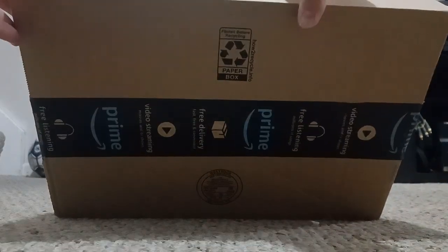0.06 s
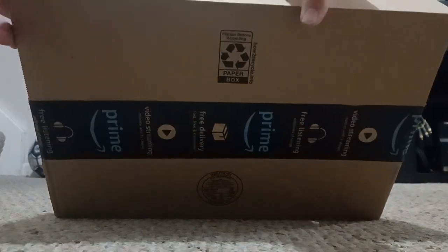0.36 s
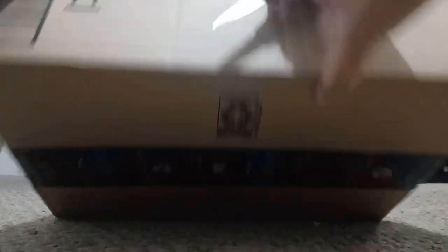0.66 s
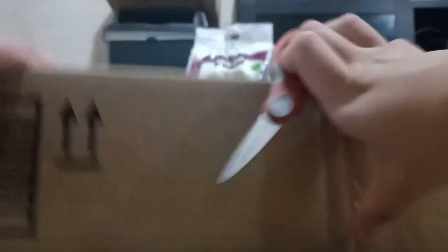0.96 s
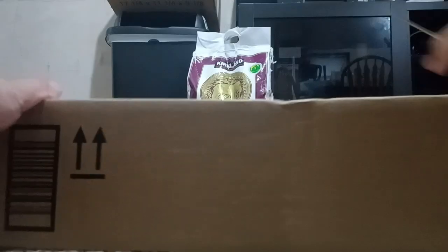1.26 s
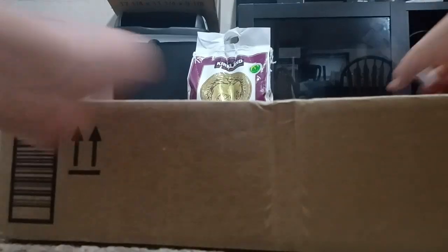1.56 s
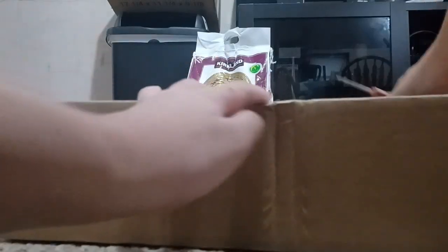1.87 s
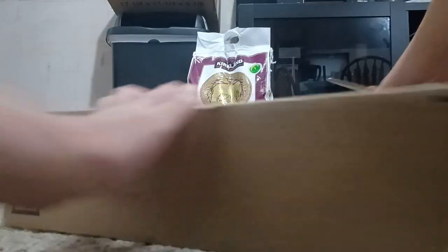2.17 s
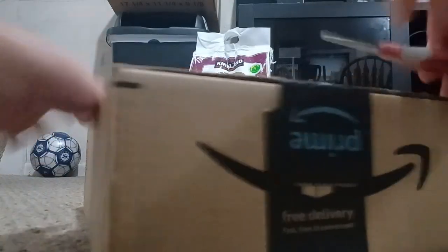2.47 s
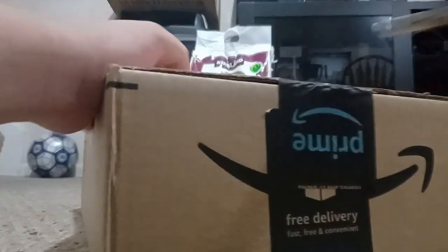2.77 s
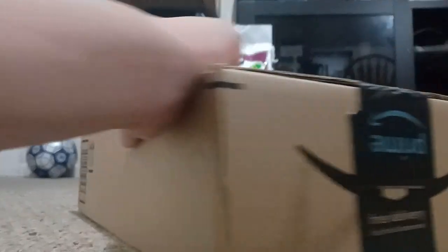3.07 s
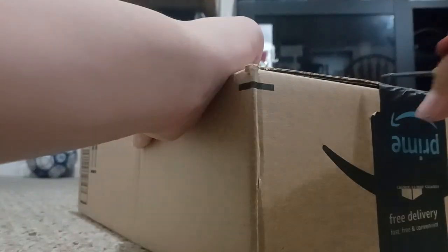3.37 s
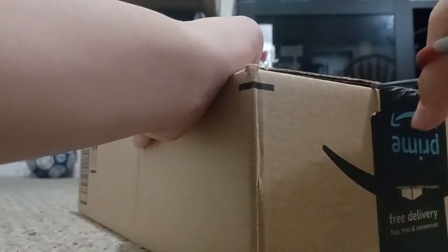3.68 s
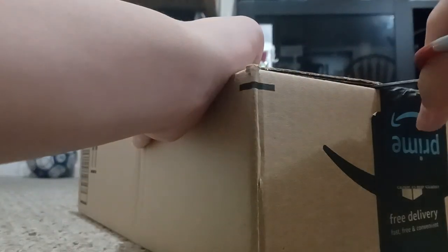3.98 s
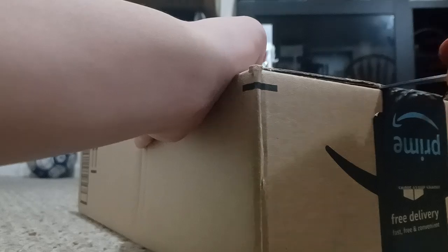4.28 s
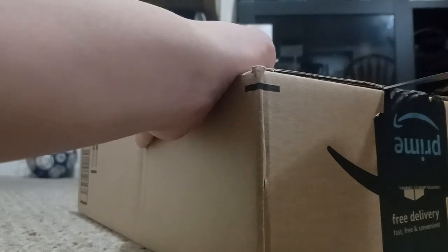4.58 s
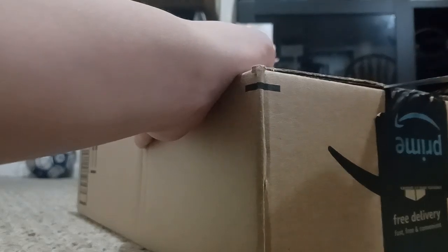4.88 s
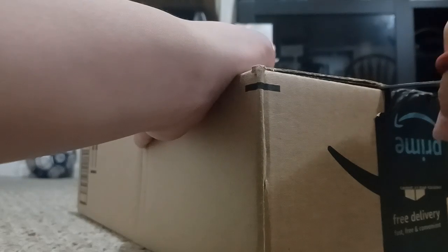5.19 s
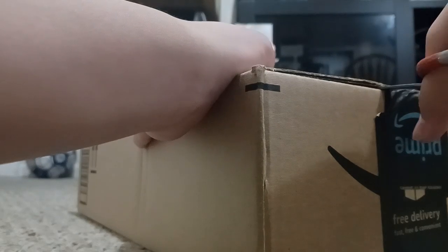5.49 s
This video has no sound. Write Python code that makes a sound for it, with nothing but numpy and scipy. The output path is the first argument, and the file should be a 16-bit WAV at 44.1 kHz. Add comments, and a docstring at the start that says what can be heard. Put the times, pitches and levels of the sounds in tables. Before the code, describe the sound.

Hands grip a cardboard box, tip it over and swing it round on carpet, making hollow thumps, papery scuffs and a hissing slide. Scissors bump it and ring faintly. Then a blade picks at the packing tape, drags along it crackling and rips through with a loud, sharp snap, followed by softer scraping. It is heard close up in a small furnished room with a faint appliance drone.

```python
"""Hollow thumps and a papery scuff: hands grip a cardboard box, tip it over and swing it round on carpet.
Its panels boom at every knock and its underside hisses over the pile. Scissors bump it and ring faintly;
then a blade picks at the packing tape, drags along it crackling and rips through with sharp snaps.
A small furnished room adds a short, dull tail over quiet air and the low drone of an appliance."""
import sys
import numpy as np
from scipy import signal
from scipy.fft import rfft, irfft
from scipy.io import wavfile

SR = 44100
rng = np.random.default_rng(int(sys.argv[2]) if len(sys.argv) > 2 else 0)


def transcribe(u):
    """Save the signal u as a 16-bit wav file named by the first command-line argument.

    u: samples, shape (n,) or (channels, n), limited to [-1, 1]; the rate is SR.
    q: integer samples, one column per channel.
    """
    v = np.clip(np.atleast_2d(u).T, -1, 1)
    q = np.round(v * 32767).astype(np.int16)
    wavfile.write(sys.argv[1], SR, q)


N = 249148
T = np.arange(N) / SR
RING = T[:SR // 3]  # time axis of one hit or tail


# Resonances of the hollow box: pitch_hz, relative_db, t60_s, left_minus_right_db
BOX_MODES = [(66, -20, 0.14, -5.5), (92.4, -7, 0.26, 7), (124.9, 3.5, 0.092, 2), (172, 3.5, 0.063, 3.5),
             (196.2, 4.5, 0.066, -2), (223.9, 1, 0.15, 2.5), (247.8, 4, 0.07, 5.5), (306.4, 0.5, 0.068, 6),
             (363.4, -3, 0.075, -2), (437.3, -4, 0.15, 0.5), (512, -15.5, 0.37, -1),
             (550.5, -10.5, 0.24, 5.5), (661, -9, 0.057, -17), (818, -8, 0.074, -10),
             (983, -5.5, 0.031, -16), (1173, -17.5, 0.27, -0.5), (1202, -14, 0.042, -21),
             (1457, -9.5, 0.014, -15.5), (2590, -37, 0.013, -6.5)]
def panels(weights):
    """The box rings as a stack of damped sines, each driven by its own weight; unit energy."""
    ring = sum((-1) ** k * weights[k] * amp(db) * sides(pan) * fade(t60) * np.sin(2 * np.pi * hz * RING)
               for k, (hz, db, t60, pan) in enumerate(BOX_MODES))
    return ring / np.sqrt(np.sum(ring ** 2) / 2)


# Hits of hands and floor on the box, levels relative: start_s, thump_db, thump_centre_hz, clack_db
BOX_HITS = [(.004, -35.5, 320, -47), (.033, -35, 285, -51), (.08, -36.5, 314, -65), (0.458, -58, 250, -56),
            (0.472, -42, 294, -43), (0.515, -38, 286, -38.5), (.699, -37.5, 243, -29.5),
            (0.808, -25.5, 198, -45), (.868, -19.5, 232, -26.5), (0.8983, -22.5, 235, -14.5),
            (.964, -27, 245, -37), (1.102, -37.5, 232, -66), (1.37, -33, 237, -35),
            (1.685, -29.5, 200, -40), (1.706, -23.5, 174, -37.5), (1.783, -19.5, 172, -44),
            (1.858, -33.5, 238, -37), (1.916, -32, 223, -45), (1.996, -30.5, 180, -51),
            (2.217, -21.5, 257, -24.5), (2.255, -24.5, 260, -28), (2.444, -16, 189, -22.5),
            (2.449, -24, 360, -36), (2.485, -21.5, 235, -49), (2.622, -41, 220, -80),
            (2.6748, -17, 154.3, -28), (2.699, -18, 166, -32.5), (2.765, -35.5, 240, -74),
            (3.49, -48.5, 249, -58), (3.5957, -44, 236.5, -56), (3.702, -40, 220, -42),
            (3.712, -32.5, 212, -37.5), (3.823, -39, 202, -42), (3.947, -46, 160, -51.5),
            (4.409, -43, 220, -79), (4.521, -17.5, 176, -48), (4.551, -20.5, 207, -27),
            (4.562, -33, 502, -29), (4.594, -36, 260, -28.5), (4.766, -46, 250, -33)]
def knocks():
    """A soft push booms the modes near its own pace; a hard contact clacks the stiff board."""
    out = np.zeros((2, N))
    mode_hz = np.array(BOX_MODES)[:, 0]
    in_step = (-1) ** np.arange(len(BOX_MODES))  # a push starts all modes the same way
    for start, thump_db, centre_hz, clack_db in BOX_HITS:
        spot = amp(rng.standard_normal(len(BOX_MODES)))  # each spot favours other modes
        push = 1 / np.sqrt(1 + (1.89 * (mode_hz / centre_hz - centre_hz / mode_hz)) ** 4)
        soft_attack = (1 - np.exp(-RING / 0.004)) ** 2
        thump = panels(spot * push * in_step) * soft_attack
        crack = band(scatter(t60=0.017), 520, 2400) * sides(-1.5)
        brightness = amp(-5 + 0.63 * (clack_db + 32.5))  # harder is brighter
        clack = panels(spot * (mode_hz > 480)) * fade(t60=0.1) + brightness * crack
        add(out, start, at_peak(thump, thump_db - 0.5))
        add(out, start, at_peak(clack, clack_db - 1.5))
    return out


# Papery tone of scuffed board: freq_hz, gain_db
SCUFF_EQ = [(150, -30), (280, -5), (420, -5.5), (520, 4.5), (640, 1.5), (800, 1), (1000, -4.5), (1200, -8),
            (1420, -10), (1950, -20), (2550, -14), (3200, -21), (6000, -24), (12000, -37)]
# Crunchy tone of the flutes as the blade bites them: freq_hz, gain_db
CRUNCH_EQ = [(150, -6.5), (300, 6.5), (440, -4.5), (520, -4.5), (630, 7.5), (780, -4.5), (1000, -0.5),
             (1200, -7.5), (1430, -4.5), (2000, -13.5), (2600, -7.5), (3200, -19.5), (6000, -22.5),
             (12000, -39.5)]
def cardboard_friction(rumble, scuff, crunch):
    """Stick-slip of skin and steel shakes the panels: hollow rumble, papery scuff and crunch."""
    shake = convolve(grains(rate_hz=900, spread_db=2), panels(np.ones(len(BOX_MODES))))
    body = unit(band(shake, 97, 380))
    skin_force = grains(rate_hz=1800, spread_db=-1.5) * flutter(rate_hz=45, depth_db=5)
    skin = scrape(skin_force, SCUFF_EQ, hollow_db=-12.5)
    blade_force = grains(rate_hz=1800, spread_db=-1.5) * flutter(rate_hz=89, depth_db=1)
    blade = scrape(blade_force, CRUNCH_EQ, hollow_db=-4) * sides(-0.75)
    return amp(-2.5) * rumble * body + amp(-1) * scuff * skin + crunch * blade


def scrape(force, eq, hollow_db):
    """Friction rustles the board and rings its hollow upper modes; rms 1."""
    rustle = unit(colour(bursts(force, t60=0.012, shared=0.38), eq)) * sides(-4.8)
    upper_modes = np.array(BOX_MODES)[:, 0] > 340
    hollow = unit(convolve(force, panels(upper_modes)))
    return unit(rustle + amp(hollow_db) * hollow)


# Hands rubbing the panels, levels relative: start_s, hold_s, rumble_db, scuff_db, hiss_db
HAND_RUBS = [(0, 0.065, -48, -51.5, -73), (0.46, .07, -53.5, -62.5, -68),
             (0.554, 0.0074, -50.5, -58.5, -53), (0.601, 0.062, -42, -54.5, -57.5),
             (0.683, 0.17, -44, -44, -52.5), (0.959, 0.005, -61, -44, -45), (1.085, 0.093, -64, -52, -70),
             (1.336, 0.077, -53.5, -66, -65.5), (1.678, 0.098, -42, -54, -62.5),
             (1.853, 0.18, -49.5, -57.5, -66), (2.652, 0.19, -52, -68, -60.5)]
def hand_rubs(attack_s=0.01, release_s=0.14):
    """Skin catches quickly and trails off: envelopes for rumble, scuff and hiss."""
    return strokes([(start, attack_s, hold, release_s, *levels) for start, hold, *levels in HAND_RUBS])


# Pushes across the carpet, levels relative: start_s, rise_s, hold_s, fall_s, rustle_db, hiss_db, rumble_db
BOX_SLIDES = [(.85, 0.039, 0.13, 0.086, -48.5, -51.5, -41), (1.04, 0.29, 0.0088, 0.1, -45.5, -47.5, -44),
              (1.86, 0.14, 0.085, 0.082, -56.5, -64, -59), (2.06, 0.14, 0.24, 0.18, -41.5, -39.5, -39.5),
              (2.72, 0.33, 0.021, 0.24, -46.5, -46.5, -51.5)]
def box_slides():
    """The box speeds up, glides and slows: envelopes for rustle, hiss and rumble."""
    return strokes(BOX_SLIDES)


# Midrange rustle of the pile: freq_hz, gain_db
PILE_EQ = [(200, -6.5), (500, 0.5), (1000, 1.5), (1800, 2.5), (3200, 0.5), (5000, -1), (6500, -8.5),
           (8000, -12.5), (12000, -10), (16000, -27.5)]
# Airy hiss on top of it: freq_hz, gain_db
SHEEN_EQ = [(1000, -11.5), (3500, -21.5), (6300, -5), (8200, -11.5), (10000, -6), (11500, -0.5), (12800, 0),
            (14500, -2.5), (16000, -16)]
def carpet(rustle, hiss):
    """Countless fibres flick the underside of the box, a different stretch of edge on each side."""
    fine = np.array([grains(rate_hz=16000, spread_db=3) for _ in range(2)])
    coarse = np.array([grains(rate_hz=16000, spread_db=3) for _ in range(2)])
    sheen = hiss * unit(colour(fine, SHEEN_EQ)) * sides(-0.52)
    pile = rustle * unit(colour(coarse, PILE_EQ)) * sides(0.17)
    return amp(0.5) * (sheen + pile) * flutter(rate_hz=69, depth_db=0.82)


# Sharpest snaps of the tape: start_s, peak_db
TAPE_SNAPS = [(.474, -45), (.9, -17), (1.86, -33), (2.677, -31), (2.699, -34), (2.781, -32), (3.598, -43),
              (3.703, -47), (3.923, -40.5), (4.286, -28), (4.302, -23), (4.314, -17), (4.329, -37),
              (4.349, -35), (4.382, -24), (4.415, -27), (4.4465, -18), (4.455, -19.5), (4.461, -36.5),
              (4.5686, -1.5), (4.5791, -8), (4.5838, -18), (4.66, -33), (4.764, -25.5), (4.836, -37.5),
              (5.383, -19.5), (5.492, -43), (5.645, -30.5)]
def tape(crackle, rasp):
    """The film hisses and ticks under the blade, rasps as it rips and snaps where it splits."""
    drag_force = grains(rate_hz=1700, spread_db=-0.5) * flutter(rate_hz=63, depth_db=2.5)
    drag = bursts(drag_force, t60=0.004, shared=0.2)
    ticks = bursts(grains(rate_hz=86, spread_db=2.5), t60=0.003, shared=0.16)
    rip = bursts(grains(rate_hz=4500, spread_db=2.8), t60=0.002, shared=0.15)
    tears = bursts(grains(rate_hz=260, spread_db=1.5), t60=0.0023, shared=0.3)
    out = crackle * (amp(-3) * unit(film(drag)) + amp(-5) * unit(film(ticks)))
    out += rasp * (amp(-1) * unit(film(rip)) + amp(-7) * unit(film(tears)))
    for start, peak_db in TAPE_SNAPS:
        snap = film(signal.unit_impulse(len(RING)) + amp(-1) * scatter(t60=0.004))
        add(out, start, at_peak(snap, peak_db))
    return out


# Thin, bright tone of taut tape: freq_hz, gain_db
FILM_EQ = [(500, -35), (1500, -26), (2700, -30.5), (4200, -26.5), (6300, -12), (8200, -12), (10000, -4.5),
           (12300, -1.5), (13600, 0), (15000, -6), (16500, -8)]
# Its stereo spread: freq_hz, left_minus_right_db
FILM_PAN = [(1000, -30), (3000, 12), (5500, 6), (8000, 5), (11000, -14.5), (16000, -11)]
def film(x):
    """The taut tape colours a sound and beams its top treble to the right."""
    left, right = colour(x, FILM_EQ)
    return np.vstack([colour(left, [(hz, db / 2) for hz, db in FILM_PAN]),
                      colour(right, [(hz, -db / 2) for hz, db in FILM_PAN])])


# Drags along the tape, levels relative: start_s, rise_s, hold_s, fall_s, crackle_db, crunch_db, rumble_db
BLADE_DRAGS = [(4.03, 0.31, 0.31, 0.07, -56.5, -58, -62.5), (4.57, 0.016, 0.015, 0.055, -74, -42, -41),
               (4.87, 0.14, 0.14, 0.2, -62.5, -59, -57), (5.27, 0.057, 0.056, 0.2, -65, -69, -65),
               (5.56, 0.049, 0.018, 0.038, -65.5, -60.5, -63)]
def blade_drags():
    """The blade bears down, pulls and eases off: envelopes for crackle, crunch and rumble."""
    return strokes(BLADE_DRAGS)


# Slips through the tape, levels relative: start_s, rasp_db, crunch_db, length_s
BLADE_SLIPS = [(3.488, -70.5, -70.5, .06), (3.582, -69.5, -70, 0.024), (3.678, -61.5, -60, 0.062),
               (3.801, -64, -72, 0.078), (3.906, -64, -68.5, 0.066), (4.513, -28, -33.5, 0.042),
               (4.551, -26.5, -30, 0.027), (4.572, -31.5, -37.5, 0.032), (4.715, -57.5, -62, 0.078),
               (4.753, -49, -47, 0.049), (5.306, -55, -55.5, 0.11)]
def blade_slips():
    """The tape gives way to the blade in short jerks: envelopes for rasp and crunch."""
    envelopes = np.zeros((2, N))
    for start, rasp_db, crunch_db, length in BLADE_SLIPS:
        jerk = signal.windows.tukey(int(length * SR), 0.7)
        add(envelopes, start, amp([[rasp_db], [crunch_db]]) * jerk)
    return envelopes


# Faint ring of the scissors: pitch_hz, relative_db
STEEL_MODES = [(985.1, -63.5), (2541, -83.5)]
def scissors(start_s=1.706, t60_s=1.8):
    """The steel blades ring on after bumping the box until the hand damps them."""
    age = np.maximum(T - start_s, 0)
    partials = sum(amp(db) * np.sin(2 * np.pi * hz * age) for hz, db in STEEL_MODES)
    ring = partials * np.exp(-np.log(1000) * age / t60_s)
    gate = stroke(start_s, rise=0.0038, hold=0.35, fall=0.08)
    return amp(8) * ring * gate * flutter(rate_hz=40, depth_db=2) * sides(-2)


def room(x):
    """Carpet and furniture leave a short, dull tail; the walls hold the low mids a little longer."""
    dull = amp(-4) * band(scatter(t60=0.16), 270, 2000)
    late = amp(-19.5) * band(scatter(t60=0.5), 150, 1200)
    bright = amp(-14) * band(scatter(t60=0.18), 1800, 16000)
    build_up = 1 - np.exp(-RING / 0.0067)
    return convolve(x, build_up * (dull + late + bright))


# Dark room tone with a drone at 97 Hz: freq_hz, gain_db
AIR_EQ = [(25, -6.5), (55, -15), (80, -3.5), (97, 16), (118, -9.5), (240, -7.5), (400, -18), (600, -12.5),
          (1000, -28.5), (2000, -35), (5000, -40.5), (12000, -38.5), (16000, -40.5)]
def room_tone():
    """Quiet room air with the low drone of an appliance."""
    noise = rng.standard_normal(N) + 0.68 * rng.standard_normal((2, N))
    return amp(-64) * unit(colour(noise, AIR_EQ))


def grains(rate_hz, spread_db):
    """Small catches of friction at random moments and strengths; rms 1."""
    catches = rng.random(N) < rate_hz / SR
    polarity = rng.choice([-1, 1], N)
    strength = amp(spread_db * np.minimum(rng.exponential(size=N), 5))
    return unit(catches * polarity * strength)


def bursts(force, t60, shared):
    """Each catch lets go in a tiny noise burst; `shared` is the power common to left and right."""
    decay = fade(t60) ** 2
    envelope = np.sqrt(np.abs(convolve(force ** 2, decay / np.sum(decay))))
    centre = np.sqrt(shared) * rng.standard_normal(N)
    wide = np.sqrt(1 - shared) * rng.standard_normal((2, N))
    return envelope * (centre + wide)


def flutter(rate_hz, depth_db):
    """Gain that wanders as the contact pressure changes."""
    knots = np.arange(0, T[-1] + 1, 1 / rate_hz)
    return amp(depth_db * np.interp(T, knots, rng.standard_normal(N)[:len(knots)]))


def stroke(start, rise, hold, fall):
    """Envelope of one movement, timed in seconds: it eases in, holds and eases out."""
    ramp = np.interp(T - start, np.cumsum([0, rise, hold, fall]), [0, 1, 1, 0])
    return np.sin(np.pi / 2 * ramp) ** 2


def strokes(rows):
    """Friction grows with speed: one envelope per level column, movements adding in power."""
    return np.sqrt(sum(np.outer(amp(row[4:]), stroke(*row[:4])) ** 2 for row in rows))


def scatter(t60):
    """Dense ring of decaying noise, different left and right; unit energy."""
    tail = rng.standard_normal((2, len(RING))) * fade(t60)
    return tail / np.sqrt(np.sum(tail ** 2, axis=1, keepdims=True))


def fade(t60):
    """Decay of 60 dB in t60 seconds."""
    return np.exp(-np.log(1000) * RING / t60)


def colour(x, eq, size=2048):
    """Minimum-phase EQ through (freq_hz, gain_db) points."""
    hz, db = np.transpose(eq)
    gain = amp(np.interp(np.log(np.fft.rfftfreq(size, 1 / SR) + 1), np.log(hz), db))
    cepstrum = irfft(np.log(gain))
    cepstrum[1:size // 2] *= 2
    cepstrum[size // 2 + 1:] = 0
    return convolve(x, irfft(np.exp(rfft(cepstrum))))


def band(x, lo_hz, hi_hz):
    """Butterworth band-pass."""
    return signal.sosfilt(signal.butter(2, [lo_hz, hi_hz], "band", fs=SR, output="sos"), x)


def convolve(x, response):
    """Pass a sound through a response, keeping its length."""
    return signal.fftconvolve(np.atleast_2d(x), np.atleast_2d(response), axes=1)[:, :x.shape[-1]]


def add(out, start_s, x):
    """Mix a short sound in at a time."""
    i = int(start_s * SR)
    out[:, i:i + x.shape[-1]] += x[:, :N - i]


def amp(db):
    """Decibels to gain."""
    return 10 ** (np.asarray(db) / 20)


def sides(db):
    """Stereo gains for a left-minus-right level."""
    return amp(np.array([[0.5], [-0.5]]) * db)


def unit(x):
    """Scale to rms 1."""
    return x / np.sqrt(np.mean(x ** 2))


def at_peak(x, db):
    """Scale to a peak level."""
    return amp(db) * x / np.abs(x).max()


def scene():
    """Slides, rubs and blade strokes drive the friction; box, carpet and tape sound in the room."""
    rustle, slide_hiss, slide_rumble = box_slides()
    hand_rumble, hand_scuff, hand_hiss = hand_rubs()
    crackle, drag_crunch, blade_rumble = blade_drags()
    rasp, slip_crunch = blade_slips()
    rumble = np.hypot(slide_rumble, hand_rumble) + blade_rumble
    scuff = np.hypot(amp(-2) * rustle, hand_scuff)  # sliding scuffs the board too
    hiss = np.hypot(slide_hiss, hand_hiss)
    crunch = amp(-5.5) * drag_crunch + slip_crunch
    near = knocks() + scissors() + carpet(rustle, hiss)
    near += cardboard_friction(rumble, scuff, crunch) + tape(crackle, rasp)
    return near + room(near) + room_tone()


def record(dry, low_cut_hz=56, high_cut_hz=16100):
    """Roll off the deep bass and cut the very top steeply."""
    thin = signal.sosfilt(signal.butter(4, low_cut_hz, "high", fs=SR, output="sos"), dry)
    return signal.sosfilt(signal.ellip(8, 0.2, 70, high_cut_hz, fs=SR, output="sos"), thin)


dry = scene()
out = record(dry)
transcribe(out)
```